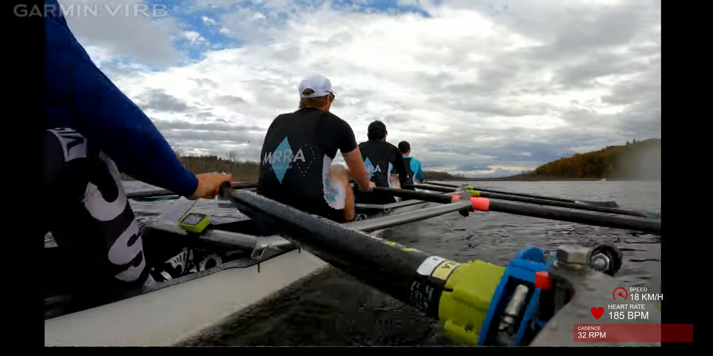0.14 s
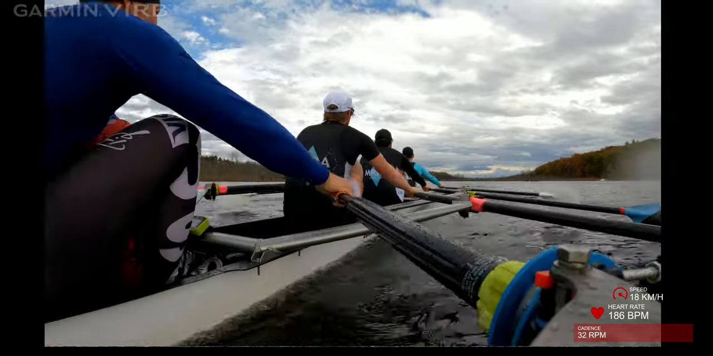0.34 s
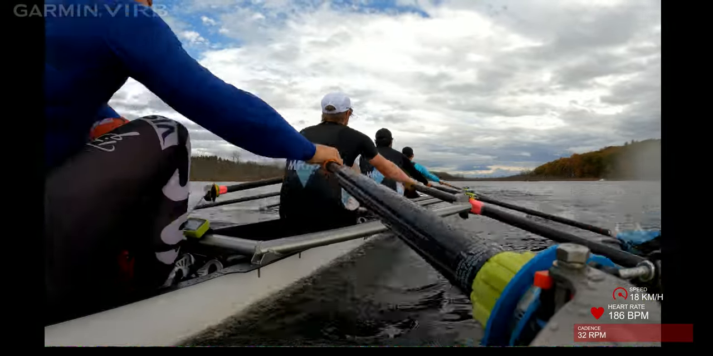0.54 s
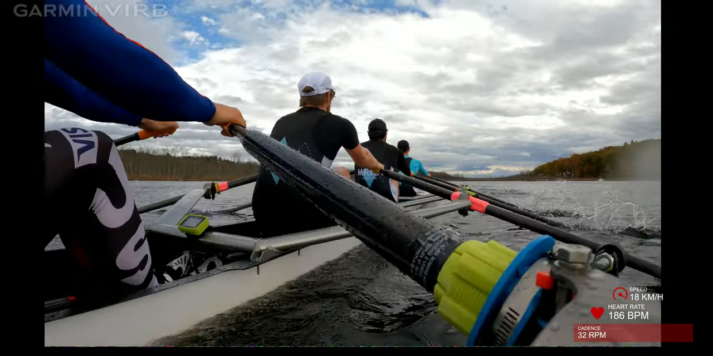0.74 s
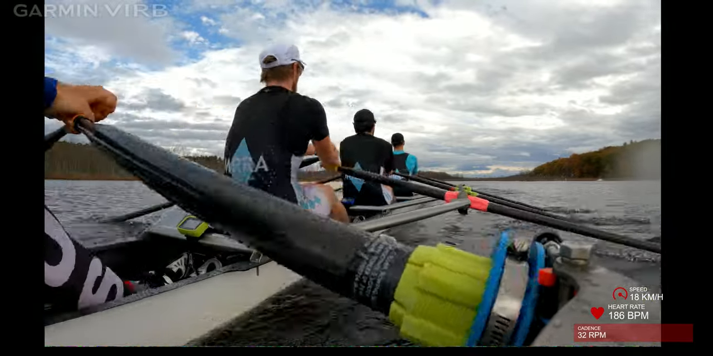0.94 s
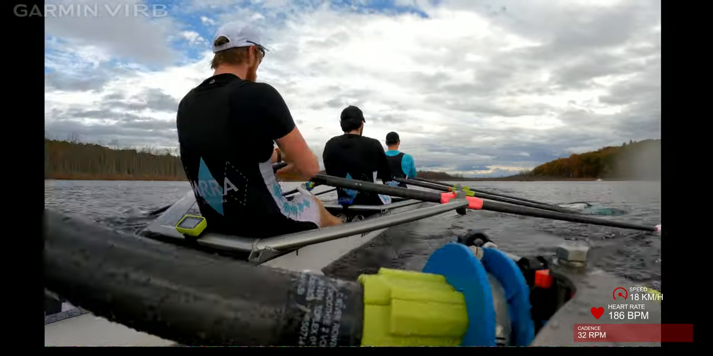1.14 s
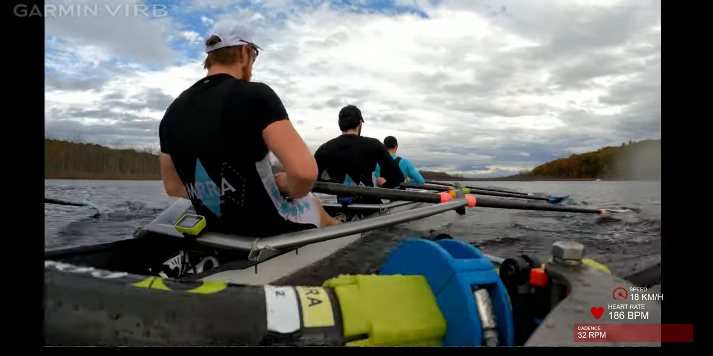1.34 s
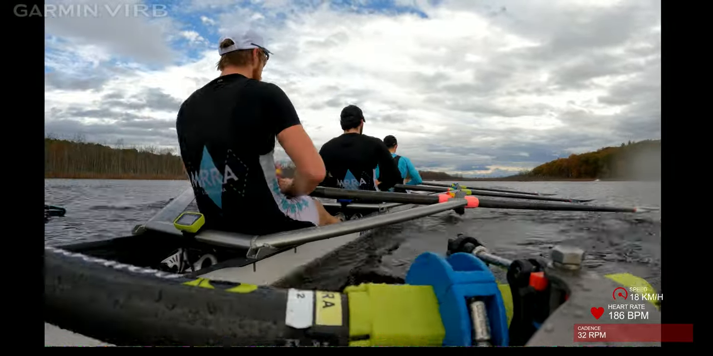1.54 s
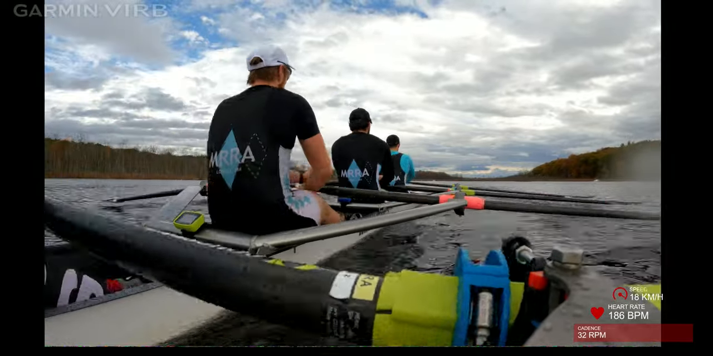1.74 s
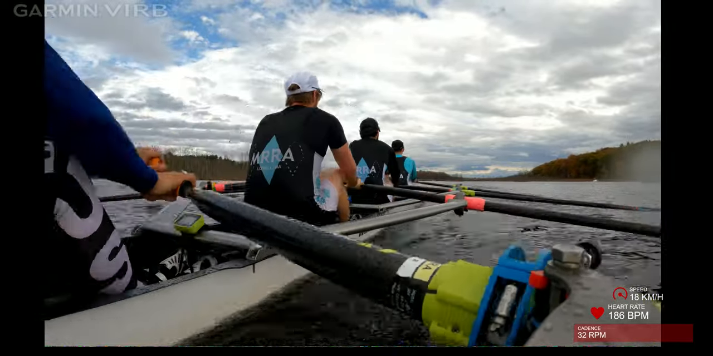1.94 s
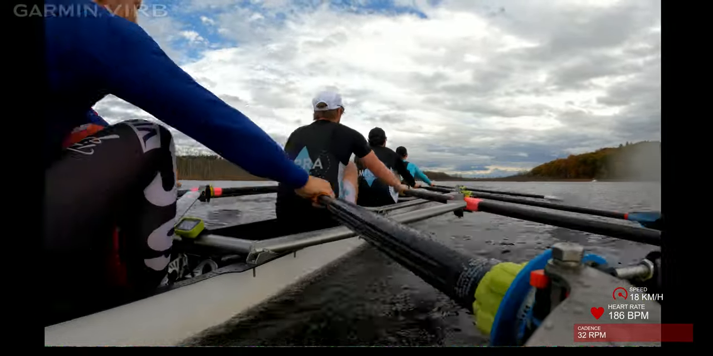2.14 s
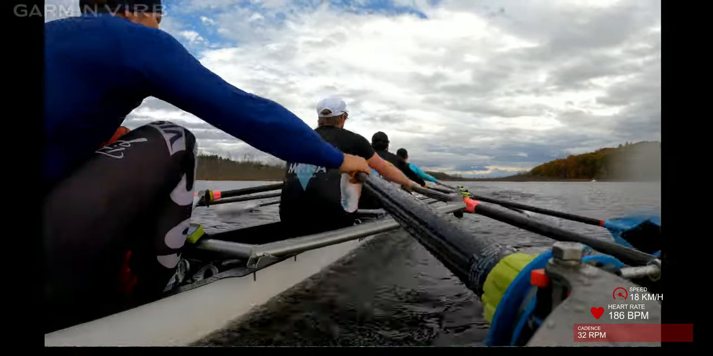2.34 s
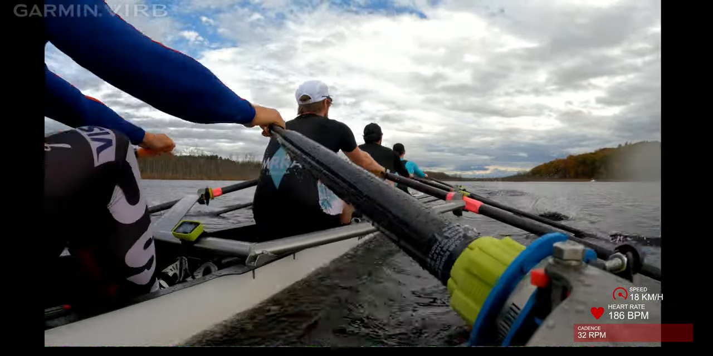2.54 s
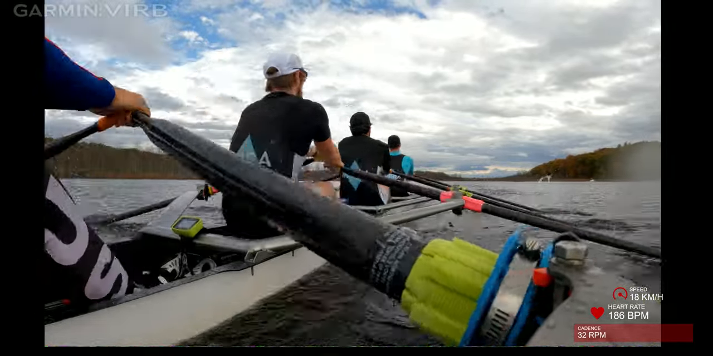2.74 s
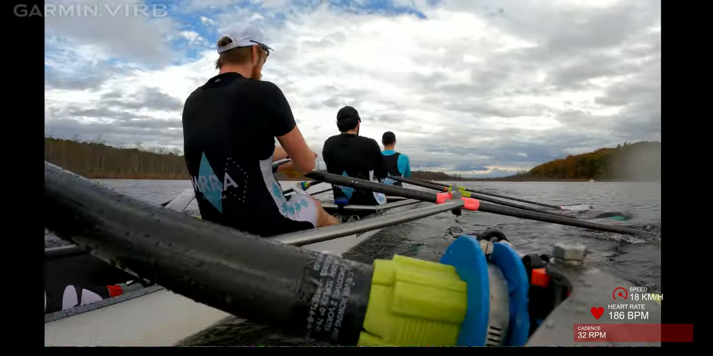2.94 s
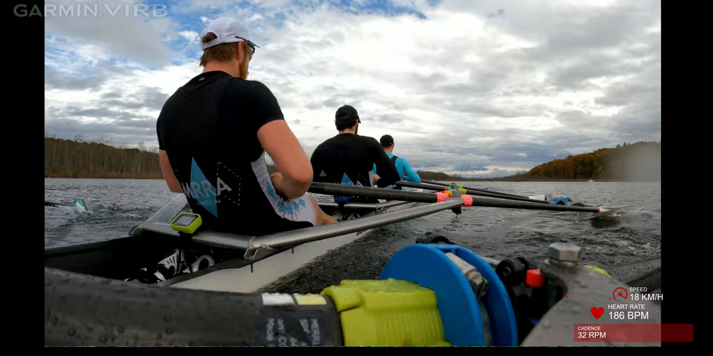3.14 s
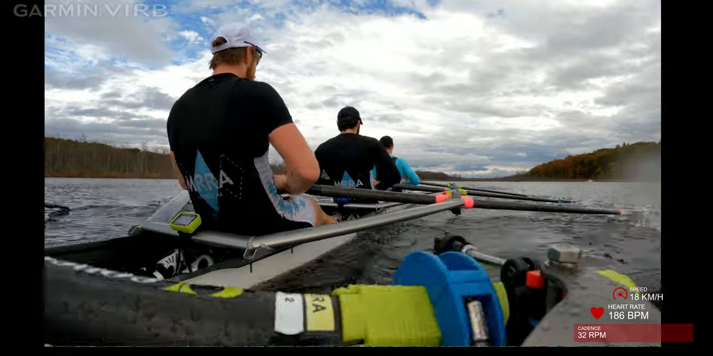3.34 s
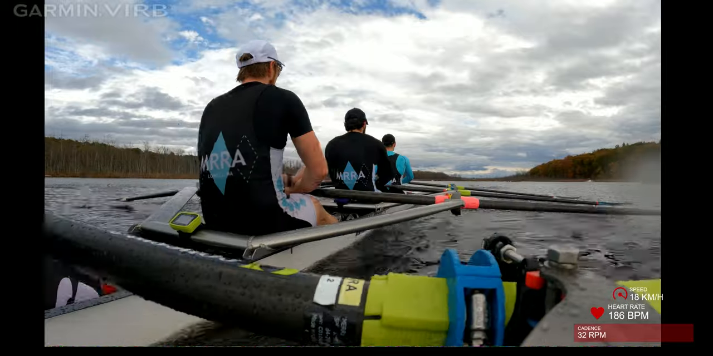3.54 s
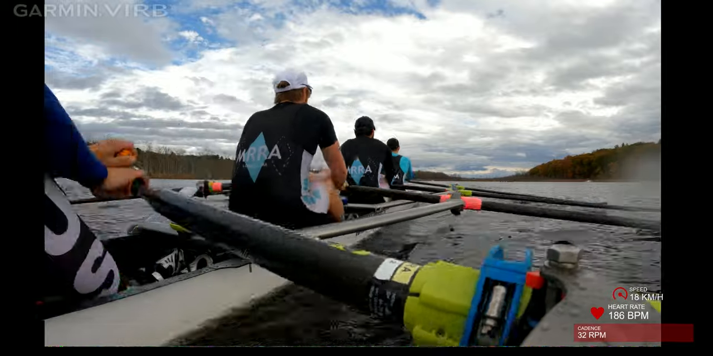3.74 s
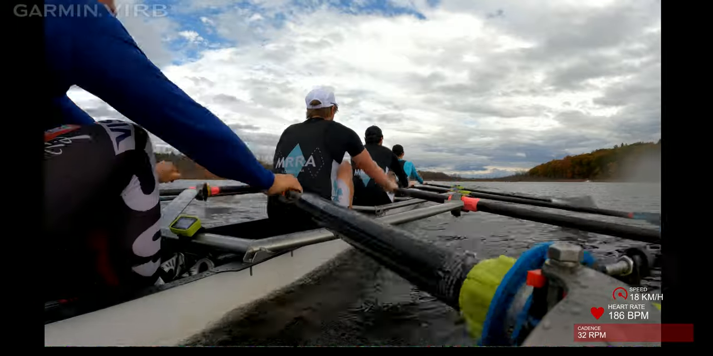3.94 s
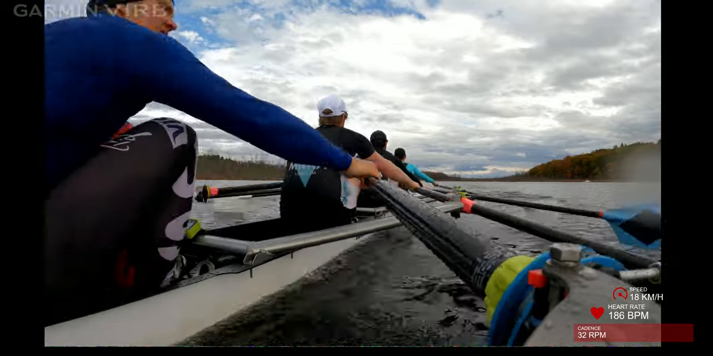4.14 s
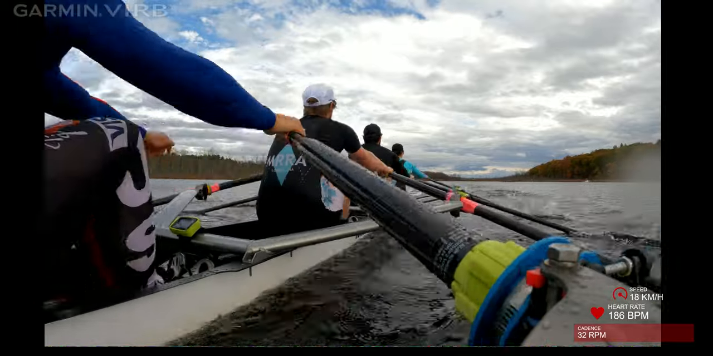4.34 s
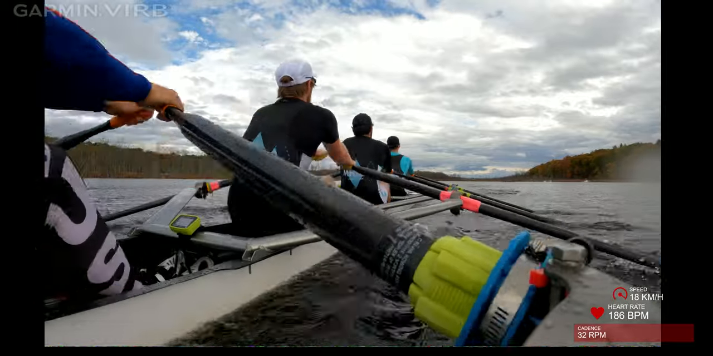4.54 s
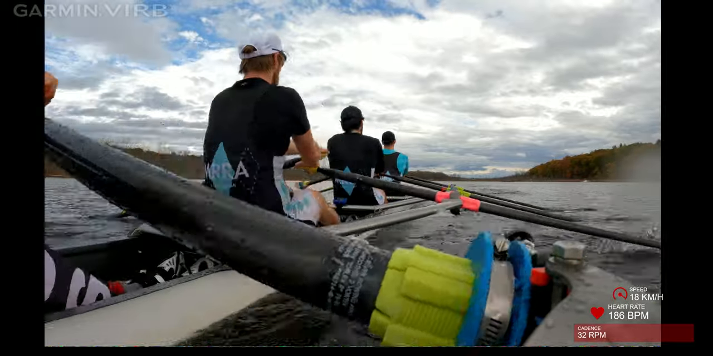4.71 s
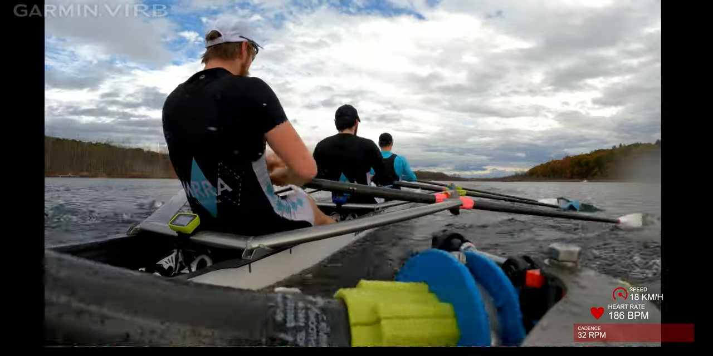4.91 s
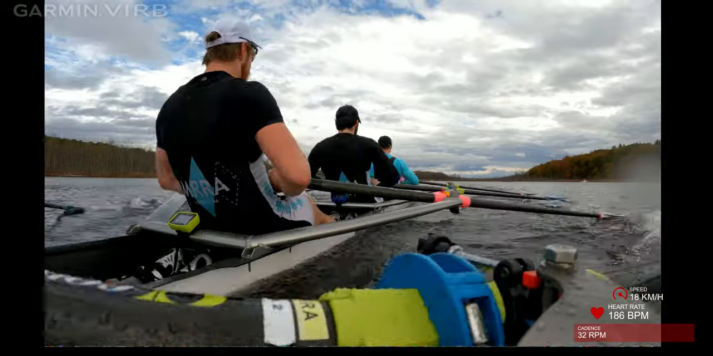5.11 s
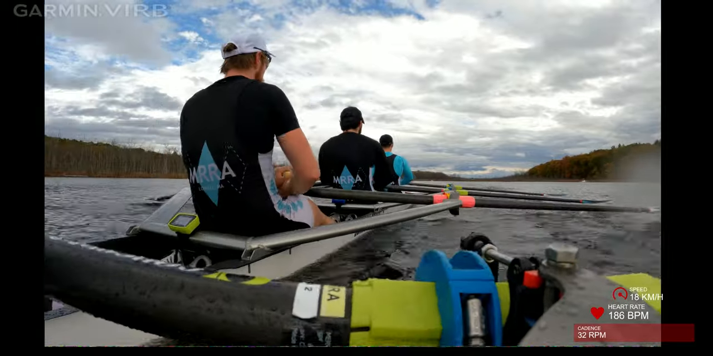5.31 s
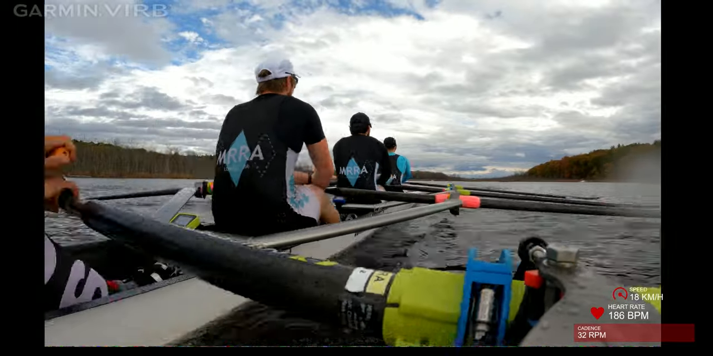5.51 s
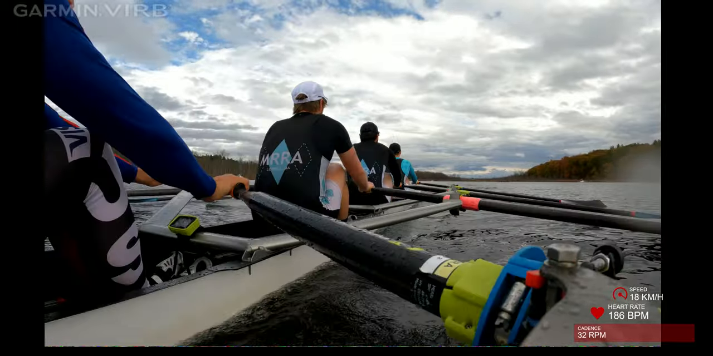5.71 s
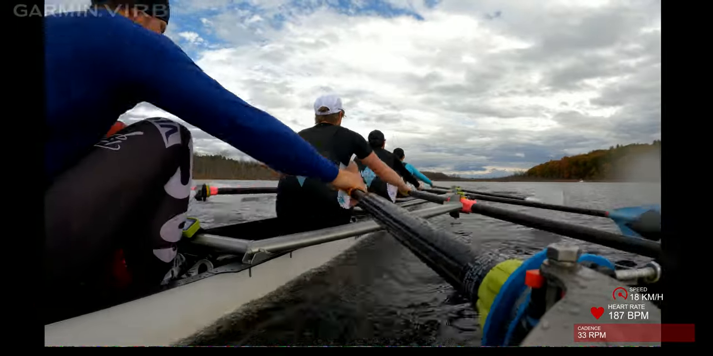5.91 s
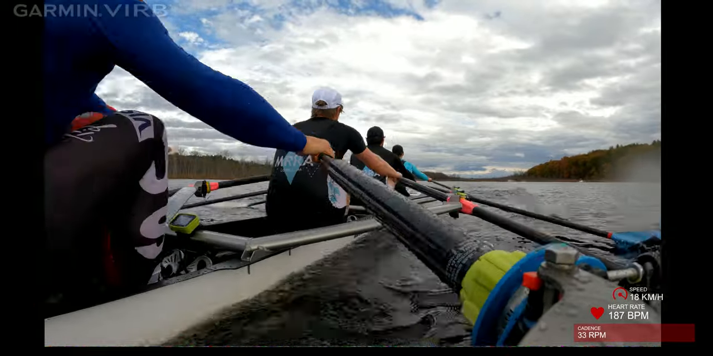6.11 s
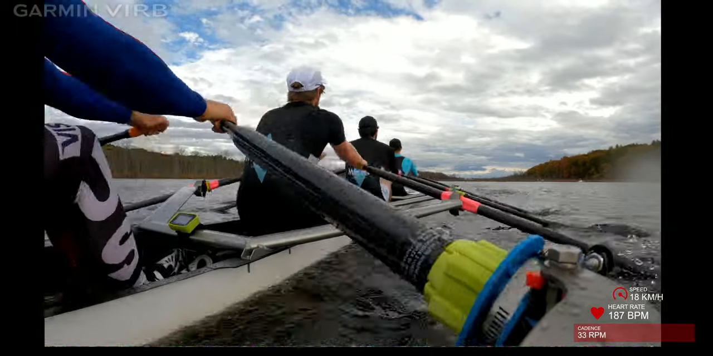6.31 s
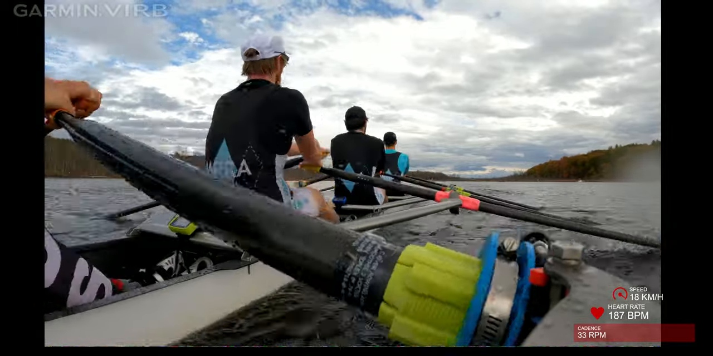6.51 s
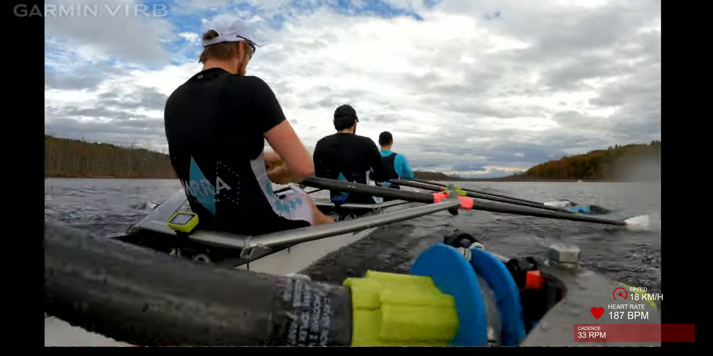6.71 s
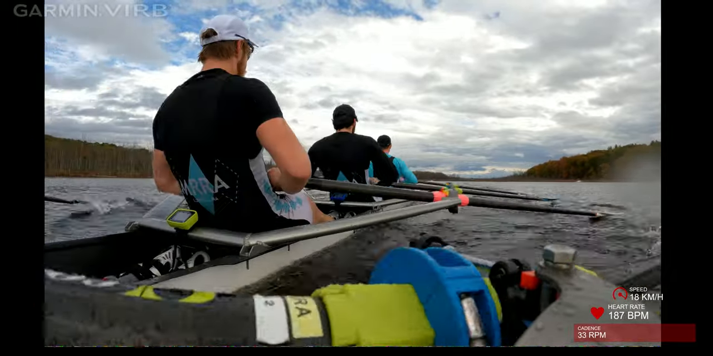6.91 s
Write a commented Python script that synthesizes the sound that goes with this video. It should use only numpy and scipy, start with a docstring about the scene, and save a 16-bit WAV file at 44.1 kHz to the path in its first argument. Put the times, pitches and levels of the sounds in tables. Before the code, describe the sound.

On open water, heard close from inside a sealed case on the rigger of a racing boat. Every stroke brings a rattling cluster of dull clunks as the oars drop in, a splash and drive, then another cluster as the blades come out and feather. Seats rumble up their tracks before each catch, water washes and gurgles along the hull, and low wind buffets. Small ticks ring the case.

```python
"""On open water, in a racing boat rowed at about 32 strokes a minute, heard inside a waterproof case on the rigger.
Filtered noise gives the wash of the lake, the wind on the case and the water that swells along the hull;
sine bubbles gurgle and plop. Trains of small impacts make the seats rumble and the sleeves rattle.
Struck bodies and damped modes give the clunks of the oars in their oarlocks, the ticks that ring the case
and the metal clinks, and the hardest feathers also send a dispersed zing along the shaft."""
import sys
import numpy as np
from scipy import signal
from scipy.fft import rfft, irfft
from scipy.io import wavfile
from scipy.ndimage import uniform_filter1d, minimum_filter1d

SR = 44100
rng = np.random.default_rng(int(sys.argv[2]) if len(sys.argv) > 2 else 0)


def unload_wav(signal):
    """Save mono or channel-first audio to the path in sys.argv[1] as 16-bit WAV at rate SR, clipped to [-1, 1]."""
    wavfile.write(
        sys.argv[1],
        SR,
        np.round(np.clip(np.atleast_2d(signal).T, -1, 1) * 32767).astype(np.int16),
    )


N = 306936
TIME = np.arange(N) / SR
SLOW_TIME = TIME[::64]  # coarse clock for the slow gains
CUTOFF_HZ = 15100

# All event levels are relative, ahead of the trim of their layer.
# Blades dropping in. Each row: start in seconds, rattle in dB, rattle length in s, splash in dB,
# splash length in s, water in the drive in dB, seats at full speed before the catch in s,
# seats speeding up in s per 20 dB, seats sliding up in dB, seats driving back in dB.
CATCHES = [(0.437, -34, 0.2, -15, 0.041, -24.5, .18, .17, -25, -26.5),
           (2.277, -31, 0.11, -19, 0.056, -21, 0.21, 0.24, -23.5, -27),
           (4.116, -36.5, 0.13, -17.5, 0.097, -21, .2, 0.17, -24.5, -27),
           (5.98, -31.5, 0.067, -16.5, 0.027, -20.5, 0.19, 0.19, -24, -26.5)]
# Blades coming out and feathering. Each row: start in seconds, rattle in dB, rattle length in s,
# rise of the wash in s per 20 dB, wash in dB, gust in dB.
FINISHES = [(-0.47, -30.5, 0.35, .04, -9, -29), (1.378, -32.5, 0.26, 0.22, -16, -21.5),
            (3.201, -30, 0.19, 0.048, -16.5, -26.5), (5.048, -32, 0.18, 0.03, -18, -25.5),
            (6.883, -38, .2, 0.11, -19.5, -25)]

# Slow gestures of each stroke. Each holds: delay in s, rise in s per 20 dB, hold in s, fall in s per 20 dB.
# A negative delay leads the stroke; a negative hold overlaps the rise and the fall.
GUST = (.01, .1, .15, .5)
HULL_RUN = (-0.19, 0.25, .15, 0.0067)
HULL_DRIVE = (0.33, 0.42, 0.17, 0.52)
RUSH_UP = (-.06, 0.42, -0.025, 0.26)
DRIVE_BACK = (0.26, 0.1, 0.37, 0.48)
ROCK_BACK = (.01, .08, .2, .3)

# Drops of the wind as the boat slows under the drive, and in some recoveries.
# Each row: start in seconds, depth in dB, length in s.
LULLS = [(0.765, -6, 0.38), (2.568, -12, 0.21), (3.718, -5, 0.08), (4.493, -16, 0.21), (5.653, -5.5, 0.015),
         (6.281, -13, 0.34)]
# Blades and wavelets plopping. Each row: start in seconds, level in dB, initial pitch in Hz, swell in s.
PLOPS = [(0.596, -25, 606, 0.0042), (1.103, -27, 750, 0.0018), (1.222, -27, 620, 0.0034),
         (1.305, -22, 740, 0.0064), (1.363, -14.5, 580, 0.0015), (1.461, -9, 562, 0.0017),
         (1.718, -21.5, 752, 0.0034), (1.836, -23, 600, 0.0028), (2.518, -31, 523, 0.0017),
         (2.78, -21, 534, 0.0022), (2.884, -17, 708, 0.0026), (3.0, -28.5, 683, .0015),
         (3.125, -33.5, 904, 0.0025), (3.653, -30, 1250, 0.0021), (4.388, -15, 560, 0.0039),
         (4.464, -22, 556, 0.0012), (4.626, -21, 548, 0.0022), (4.945, -23, 860, 0.0019),
         (4.963, -17.5, 813, 0.0033), (4.978, -23.5, 902, 0.0023), (5.013, -22, 580, 0.0042),
         (5.081, -18, 705, 0.0043), (5.602, -22.5, 850, 0.002), (6.231, -16.5, 597, 0.0031),
         (6.753, -15.5, 880, 0.0016), (6.799, -21, 688, 0.0061), (6.836, -24.5, 794, 0.0041)]
# Scuffs of a seat wheel on its track, on the way up the slide. Each row: start in seconds, level in dB.
SCUFFS = [(2.027, -24), (2.053, -26.5), (2.076, -29)]
# Light ticks on the rigger that ring the case. Each row: start in seconds, tick in dB, ring in dB.
TICKS = [(0.074, -49, -47), (0.284, -46, -34), (0.3238, -54, -49), (0.6680, -31, -27), (0.7841, -39, -29.5),
         (1.1438, -56.5, -31.5), (1.651, -33, -31), (1.663, -36, -30), (1.8812, -34.5, -32),
         (2.411, -56, -34.5), (2.438, -57, -35), (2.5437, -34, -26), (2.7497, -51, -46), (2.917, -56, -35),
         (3.0087, -45, -29.5), (3.0548, -63, -45), (3.266, -55, -31), (3.27, -56, -29), (3.306, -55, -29),
         (3.389, -50, -19), (3.5696, -50, -35.5), (4.2944, -26.5, -27.5), (4.4127, -62.5, -32),
         (4.7477, -50, -35.5), (4.776, -50, -45), (4.8215, -49, -43), (4.8482, -48.5, -35),
         (5.2772, -34, -31), (5.3466, -41, -47), (5.36, -48, -32), (5.3896, -40, -35), (5.4407, -31, -29.5),
         (5.602, -52, -47), (5.7873, -50, -41), (5.9315, -43, -39), (5.951, -47, -34.5),
         (6.071, -57.5, -30), (6.1338, -31, -26.5), (6.2026, -34.5, -30), (6.2415, -37, -30),
         (6.6858, -45, -29.5)]
# Clinks of the oarlock at the hardest feathers. Each row: start in seconds, clink in dB, snap in dB,
# zing in dB, pitch at which the zing splits in Hz.
CLINKS = [(1.5378, -32, -19, -46, 7700), (3.403, -33, -20.5, -43, 7540), (3.414, -38, -25, -38.5, 7230)]
# Hard knocks of oars in their oarlocks. Each row: start in seconds, clack in dB, thud in the hull in dB,
# sharp edge in dB.
KNOCKS = [(0.451, -18, -20, -34), (0.4606, -18, -17, -52), (0.4743, -25, -6, -53), (0.4845, -25, -7, -47),
          (0.509, -27, -12.5, -48), (0.5217, -22, -14, -26.5), (0.5451, -27, -11, -31),
          (0.562, -30, -15, -39), (0.582, -28, -19, -44), (0.5972, -23, -7, -55), (0.602, -24.5, -9, -48),
          (0.6164, -33, -11.5, -50), (1.332, -23, -5.5, -49), (1.4043, -26, -3.5, -53),
          (1.4154, -22, -4, -34), (1.4215, -27, -12, -52), (1.4437, -39, -15, -47), (1.4624, -22, -5, -46),
          (1.481, -26, -10, -50), (1.4993, -24, -22, -36), (1.524, -14.5, -19, -41),
          (1.5363, -21, -19, -31), (1.552, -25, -12, -50), (1.6015, -21.5, -26, -53),
          (1.605, -23.5, -17, -53), (2.2782, -19.5, -17, -44), (2.2899, -26, -1.5, -47),
          (2.3179, -36, -11, -47), (2.336, -36.5, -6, -42), (2.358, -17.5, -4, -28), (2.3827, -29, -5, -39),
          (2.3992, -34, -9, -47), (3.213, -16.5, -18, -36), (3.218, -20, -5, -35), (3.23, -33, -17.5, -50),
          (3.279, -22, -8, -28), (3.293, -34, -6, -51), (3.307, -28, -10, -57), (3.329, -23, -4, -48),
          (3.3528, -15, 0.5, -18.5), (3.374, -19, -17, -50), (3.389, -17, -15, -48),
          (3.392, -14, -2.5, -40), (3.453, -23.5, -29, -27), (3.494, -25, -29, -52),
          (4.124, -20.5, -7, -41), (4.133, -19, -27.5, -35), (4.186, -24, -14, -51),
          (4.1994, -15.5, -3.5, -31.5), (4.2229, -21, -0.5, -59.5), (4.2352, -29.5, -8.5, -52),
          (4.31, -26, -14.5, -49), (4.3289, -27.5, -9, -42), (4.344, -23, -28.5, -58),
          (5.055, -21, -2, -32), (5.0614, -28, -7, -31.5), (5.1082, -14.5, 2, -39), (5.119, -24, -9.5, -41),
          (5.1413, -25, -12, -37), (5.168, -18.5, -8, -34), (5.175, -25, 0, -38), (5.18, -27, -6, -36),
          (5.202, -17.5, -1, -44.5), (5.2089, -26, -22, -32.5), (5.222, -26, -9, -42),
          (5.236, -23, -13, -48), (5.2548, -22, -15, -55), (5.265, -21, -16, -55), (5.296, -23, -15, -54),
          (5.9839, -23, -19, -37), (5.991, -27, -20, -50), (6.0103, -21, -6, -43), (6.0246, -32, -13, -36),
          (6.037, -33, -7, -34), (6.9011, -21.5, -15, -41), (6.9076, -21, -5, -37), (6.927, -26, -12, -54)]

# Spectra of the media and bodies. Each row: frequency in Hz, relative density in dB per Hz.
LAKE = [(200, -2), (1000, -7.5), (1800, -13.5), (2700, -26.5), (3200, -30), (3600, -31.5), (3950, -52),
        (5200, -47), (7000, -66), (15000, -89)]
WIND = [(8, -9.5), (25, -0.5), (50, -6), (90, -8), (160, -16.5), (400, -51.5), (1500, -62.5), (4000, -110)]
WATER = [(40, -19), (90, -7), (140, 3.5), (220, -3), (320, -0.5), (420, -12), (800, -18), (1400, -21),
         (1800, -39), (2700, -37.5), (3200, -59.5), (4100, -66.5), (5200, -69.5), (7500, -85),
         (15000, -100)]
RUSH = [(300, -13), (700, 0.5), (1400, 4), (1750, -11), (2400, -7.5), (2800, -13), (3300, -24.5),
        (4000, -45.5), (8000, -70.5)]  # bow wave and wheels
SEATS = [(120, -22.5), (300, 1.5), (530, 3.5), (780, -0.5), (1000, -4), (1230, -5), (1500, -12),
         (1800, -27), (2200, -20), (2750, -34.5), (3200, -45), (4100, -69.5), (5200, -70), (7500, -87),
         (15000, -100)]
SCUFF = [(500, -31), (1200, 6), (1650, 1), (2100, -12.0), (3000, -28.5), (4200, -51), (9000, -90)]
GRIND = [(150, -19.5), (500, 4.5), (950, -0.5), (1250, 8.5), (1750, 0.5), (2300, -0.5), (2850, -3),
         (3300, -17.5), (4100, -37.5), (5100, -37.5), (6000, -43), (7500, -66), (14000, -72)]  # sleeve against oarlock
OARLOCK = [(150, -28), (500, 1.5), (950, 3), (1250, 9.5), (1750, 5), (2300, 11), (2800, -11.5), (3300, -13),
           (4150, -34), (5000, -32.5), (6000, -57.5), (7500, -42), (14000, -47.5)]
CASE = [(1200, -18.5), (1900, -10.5), (2250, -6.5), (2550, -2.5), (2850, -6), (3080, -25.5), (3800, -39),
        (7000, -62)]  # crowded modes of the case
EDGE = [(500, -9.5), (1600, 0), (2700, 3.5), (3300, 16), (4100, -6), (4550, 0), (5100, 2.5), (5800, -11),
        (6600, -20.5), (7800, -43.5), (10000, -53), (15000, -64)]  # sharp onset of a contact
SNAP = [(1000, -13), (3000, 2), (4200, 3.5), (5300, -8), (7300, -17), (8500, -30), (12000, -55)]  # metal on metal
SIZZLE = [(600, -14), (2200, -11), (3100, 3.5), (4000, -8), (5300, -17.5), (6300, -19), (7500, -35),
          (9200, -25.5), (11000, -41), (16000, -65)]
HULL = [(30, -18.5), (70, 1.5), (110, 8), (220, -4), (320, -3.5), (400, -2.5), (520, -7), (800, -9.5),
        (1400, -16.5), (3000, -55.5), (6000, -100)]
# Body of water closing over a bubble. Each row: frequency as a ratio to the bubble pitch, level in dB.
CAVITY = [(1 / 4, -30), (0.72, -8), (1, 0), (0.86, -5), (2, -32), (6, -85)]

# Resonances of the seat tracks. Each row: frequency in Hz, bandwidth in Hz, relative level in dB.
TRACK_MODES = [(323.2, 16, -7.5), (550, 110, -5.5), (1212, 98, -16)]
# Struck modes of the case, of the oarlock metal and of the oarlock gate.
# Each row: nominal frequency in Hz, relative level in dB, t60 in s.
CASE_MODES = [(2225, 0, 0.062), (2400, -6, 0.043), (2426, -3.5, 0.15), (2640, -5, 0.14), (2640, -6, 0.11)]
METAL_MODES = [(1900, 12, 0.099), (2160, 8, 0.084), (2160, 1, .14), (2640, -9, .17), (3150, -2, 0.23),
               (3130, -5, 0.21), (3760, -5, .15), (4070, -11, .17), (4100, -4, .16), (4950, -6, .09),
               (5400, -11, .1), (6450, -15.5, .08)]
GATE_MODES = [(318, -11, 0.012), (555, -1.5, 0.06), (756, 2.5, 0.097), (946, -2, 0.05), (1253, -3.5, 0.16),
              (1455, -5, 0.081), (2230, -17, 0.044), (2640, -11, 0.054)]

# Floors between the gestures (dB)
BREEZE_DB, RIPPLE_DB, SEAT_IDLE_DB = -22.5, -32.5, -39
# In the gesture settings below, rises and falls are in s per 20 dB.
LULL_RISE_S, LULL_FALL_S = 0.054, 0.31  # these scale with the depth of the lull: see wind()
SPLASH_AFTER_S, SPLASH_RISE_S, SPLASH_FALL_S = 0.016, 0.11, .22
WASH_AFTER_S, WASH_HOLD_S, WASH_FALL_S = 0.021, 0.18, 0.26
SLIDE_FALL_S = 0.13
RATTLE_RISE_S, RATTLE_FALL_S = 0.0091, 0.033
# Light rubbing before and after the sleeve turns; its level is relative to the rattle
RUB_DB, RUB_RISE_S, RUB_FALL_S = -4, 0.029, .6
# Falling branch of the zing: time to fall by a factor e, time of the peak, swell and fade, bandwidth
DIVE_S, DIVE_PEAK_S, DIVE_RISE_S, DIVE_FALL_S, DIVE_WIDTH_HZ = 0.06, 0.065, 0.064, 0.041, 1900
# Rising branch: extent and time constant of the climb, t60, bandwidth, level relative to the falling one
CLIMB_HZ, CLIMB_S, CLIMB_T60_S, CLIMB_WIDTH_HZ, CLIMB_DB = 3600, 0.038, 0.25, 2000, -21.5


def amp(db):
    """Converts decibels to an amplitude ratio."""
    return 10 ** (np.asarray(db) / 20)


def unit(x):
    """Normalises a signal to an rms of 1."""
    return x / np.sqrt(np.mean(x ** 2) + 1e-20)


def add(mix, s, sound):
    """Superposes a sound on the mix from time s."""
    part = mix[max(round(s * SR), 0):][:len(sound)]
    part += sound[:len(part)]


def noise():
    """White noise: equal power at all frequencies."""
    return rng.standard_normal(N)


def response(spectrum, size=4096):
    """Minimum-phase impulse response: a causal cepstrum fixes the phase; its energy is 1."""
    hz, db = np.transpose(spectrum)
    log_hz = np.log(np.fft.rfftfreq(size, 1 / SR) + 1)
    log_gain = np.log(amp(np.interp(log_hz, np.log(hz), db)))
    cepstrum = irfft(log_gain)
    cepstrum[1:size // 2] *= 2
    cepstrum[size // 2 + 1:] = 0
    taps = irfft(np.exp(rfft(cepstrum)))
    return taps / np.linalg.norm(taps)


def colour(x, spectrum):
    """Linear filtering: convolves a force with the response of a body."""
    return signal.oaconvolve(x, response(spectrum))[:len(x)]


def churn(x, depth_db, frame_count=12, bin_count=3):
    """Turbulent modulation: random patches in time and pitch swell and fade, as eddies and cavities do."""
    grid = signal.stft(x, nperseg=1024, noverlap=768)[2]
    patches = uniform_filter1d(rng.standard_normal(grid.shape), frame_count, axis=1)
    patches = uniform_filter1d(patches, bin_count, axis=0)
    return signal.istft(grid * amp(depth_db * unit(patches)), nperseg=1024, noverlap=768)[1][:N]


def surges(depth_db, length_s):
    """Slow random modulation: a gain that wanders between independent levels length_s apart."""
    steps = rng.standard_normal(1000)
    return amp(depth_db * np.interp(TIME / length_s, np.arange(len(steps)), steps))


def swell(s, after_s, rise_s, hold_s, fall_s):
    """Exponential envelope of one gesture: rises 20 dB in rise_s, holds at 1, falls 20 dB in fall_s."""
    t = SLOW_TIME - s - after_s
    return amp(-20 * (np.maximum(-t, 0) / rise_s + np.maximum(t - hold_s, 0) / fall_s))


def together(gains):
    """Incoherent addition: the powers of independent gestures sum; the result is a gain per sample."""
    return np.interp(TIME, SLOW_TIME, np.sqrt(sum(gain ** 2 for gain in gains)))


def impacts(per_s, spread_db):
    """Random point process: small blows of uneven size and either sign, at a mean rate per second."""
    size = amp(spread_db * np.minimum(rng.exponential(1, N), 4))
    return unit(size * rng.choice([-1, 1], N) * (rng.random(N) < per_s / SR))


def blow(spectrum, t60, chatter, size=8000):
    """Impulsive excitation: an impact and its dying contact noise drive a body; peak 1."""
    t = np.arange(size) / SR
    force = rng.standard_normal(size) * amp(-60 * t / t60) * (1 - np.exp(-t / 0.0007))
    force *= chatter / np.linalg.norm(force)
    force[0] += 1
    sound = colour(force, spectrum)
    return sound / abs(sound).max()


def ring(modes, detune, onset_s, size=12000):
    """Modal superposition: damped sines of random phase, slightly detuned at each contact; peak 1."""
    t = np.arange(size) / SR
    sound = np.zeros(size)
    for hz, db, t60 in modes:
        cycles = hz * rng.normal(1, detune) * t + rng.random()
        sound += amp(db - 60 * t / t60) * np.sin(2 * np.pi * cycles)
    sound *= np.tanh(t / onset_s) ** 2  # the body takes a moment to answer
    return sound / abs(sound).max()


def bubble(hz, swell_s, rise):
    """Volume oscillation of trapped air: it swells, rings while rising in pitch, and dies; envelope peak 1."""
    t = TIME[:SR // 9]
    envelope = (t / swell_s) ** 2 * np.exp(2 - 2 * t / swell_s)
    return envelope * np.sin(2 * np.pi * hz * t * (1 + rise * t))


def lake(level_db=-44, patchy_db=2, lap_db=2.5):
    """Distributed turbulence: the wash of open water is broadband noise that laps unevenly."""
    wash = colour(churn(noise(), patchy_db), LAKE)
    return amp(level_db) * unit(wash * surges(lap_db, length_s=0.11))


def wind(level_db=-0.6):
    """Pressure fluctuation on the case: low noise drops in the lulls and gusts as the boat surges at each finish."""
    lull_db = sum(db * swell(s, 0, LULL_RISE_S, length, LULL_FALL_S) for s, db, length in LULLS)
    gusts = [amp(gust_db) * swell(s, *GUST) for s, *_, gust_db in FINISHES]
    gain = together([amp(BREEZE_DB + lull_db)] + gusts)
    return amp(level_db) * gain * unit(colour(noise(), WIND))


def flow(run_db=-21):
    """Gain of flow along the hull: the run into the catch, the splash, the drive, the wash of the finish."""
    gains = [amp(RIPPLE_DB)]
    for s, _, _, splash_db, splash_s, drive_db, *_ in CATCHES:
        gains.append(amp(run_db) * swell(s, *HULL_RUN))
        gains.append(amp(drive_db) * swell(s, *HULL_DRIVE))
        splash = swell(s, SPLASH_AFTER_S, SPLASH_RISE_S, splash_s, SPLASH_FALL_S)
        gains.append(amp(splash_db) * splash)
    for s, _, _, rise_s, wash_db, _ in FINISHES:
        gains.append(amp(wash_db) * swell(s, WASH_AFTER_S, rise_s, WASH_HOLD_S, WASH_FALL_S))
    return together(gains)


def water(level_db=-3.0, patchy_db=2.5, surge_db=2.0):
    """Turbulent excitation of a shell: the hull drums with churning water that comes in surges."""
    churning = colour(churn(noise(), patchy_db, frame_count=18, bin_count=2), WATER)
    return amp(level_db) * flow() * unit(churning * surges(surge_db, length_s=.07))


def rush(level_db=-37, patchy_db=2.0):
    """Noise growing with speed: a smooth rush builds as the boat runs fastest, just before each catch."""
    gain = together([swell(s, *RUSH_UP) for s, *_ in CATCHES])
    return amp(level_db) * gain * unit(colour(churn(noise(), patchy_db), RUSH))


def gurgles(level_db=-8, cycles=2.29, rise=1.3, tilt=0.59, count=22):
    """A population of bubbles: many sizes ring along the hull, the large, low ones the loudest."""
    out = np.zeros(N)
    for hz in np.geomspace(170, 1100, count):
        sound = bubble(hz, cycles / hz, rise) / hz ** tilt
        for when, strength in rng.random(size=(52, 2)):
            add(out, when * N / SR, (2 * strength - 1) * sound)
    return amp(level_db) * flow() * unit(out)


def plops(level_db=1, rise=6, slosh=0.84):
    """Bubble resonance and cavity closure: a large bubble rings, and the water closes over it."""
    out = np.zeros(N)
    for s, db, hz, swell_s in PLOPS:
        add(out, s, amp(db + level_db) * bubble(hz, swell_s, rise))
        cavity = [(ratio * hz, cavity_db) for ratio, cavity_db in CAVITY]
        add(out, s, amp(db) * slosh * blow(cavity, t60=0.12, chatter=8.8))
    return out


def seats(level_db=0.0, patchy_db=1.3, finish_db=-26, drone_db=-7, jolt_db=1.0):
    """Rolling contact: wheels strike the grain of their tracks, which drone at their resonances."""
    gains = [amp(SEAT_IDLE_DB)]
    gains += [amp(finish_db) * swell(s, *ROCK_BACK) for s, *_ in FINISHES]
    for s, *_, lead_s, rise_s, up_db, back_db in CATCHES:
        gains.append(amp(up_db) * swell(s, -lead_s, rise_s, lead_s, SLIDE_FALL_S))
        gains.append(amp(back_db) * swell(s, *DRIVE_BACK))
    bumps = impacts(per_s=7000, spread_db=2.5)
    roll = unit(colour(churn(bumps, patchy_db), SEATS))
    for hz, width_hz, db in TRACK_MODES:
        drone = signal.lfilter(*signal.iirpeak(hz, hz / width_hz, SR), colour(bumps, SEATS))
        roll = roll + amp(drone_db + db) * unit(drone * surges(depth_db=1.0, length_s=0.15))
    return amp(level_db) * together(gains) * unit(roll * surges(jolt_db, length_s=0.036))


def scuffs(level_db=0, t60=0.19):
    """Sliding friction: a seat wheel scuffs the side of its track in a short burst of noise."""
    out = np.zeros(N)
    for s, db in SCUFFS:
        add(out, s, amp(db + level_db) * blow(SCUFF, t60, chatter=6))
    return out


def ticks(tick_db=0.0, clack_db=-1, ring_db=-5.0, shiver_db=-6, buzz_db=-10, body_db=-6, rebound_db=-7,
          rebound_s=0.012, vary=0.35):
    """Impact and rebound: a tick snaps the case, raps its mount, rebounds once and leaves both ringing."""
    out = np.zeros(N)
    for s, tick, level in TICKS:
        length, delay = np.exp(vary * rng.standard_normal(2))  # never quite alike
        add(out, s, amp(tick + tick_db) * blow(EDGE, t60=0.011, chatter=0.87))
        add(out, s, amp(level + clack_db) * blow(CASE, t60=0.018, chatter=0.78))
        add(out, s, amp(level + body_db) * blow(OARLOCK, t60=0.016, chatter=1.4))
        add(out, s + rebound_s * delay, amp(level + rebound_db) * blow(OARLOCK, t60=.03, chatter=2.5))
        add(out, s, amp(level + ring_db) * ring(CASE_MODES, detune=.018, onset_s=0.0036))
        add(out, s, amp(level + shiver_db) * blow(CASE, t60=0.19 * length, chatter=13))
        add(out, s, amp(level + buzz_db) * blow(GRIND, t60=0.14 * length, chatter=6.5))
    return out


def rattle(grind_db=-7.5, slip_db=-9.5, edge_db=-27, ring_db=-10):
    """Stick and slip: each sleeve grinds as it turns in its oarlock, and its small sharp jerks ring the case."""
    strokes = [row[:3] for row in CATCHES + FINISHES]
    turn = together([amp(db) * swell(s, 0, RATTLE_RISE_S, length, RATTLE_FALL_S)
                     for s, db, length in strokes])
    rub = together([amp(db + RUB_DB) * swell(s, 0, RUB_RISE_S, length, RUB_FALL_S)
                    for s, db, length in strokes])
    friction = np.hypot(turn, rub) * unit(churn(noise(), depth_db=2.0))
    grind = amp(grind_db) * colour(friction, GRIND)
    slips = turn * impacts(per_s=380, spread_db=7.0)
    jerks = amp(slip_db) * colour(slips, OARLOCK) + amp(edge_db) * colour(slips, EDGE)
    case = blow(CASE, t60=0.09, chatter=9.0)
    ringing = amp(ring_db) * signal.oaconvolve(slips, case / np.linalg.norm(case))[:N]
    return grind + jerks + ringing


def glide(hz, width_hz, ragged_db=3):
    """Frequency translation: complex low-pass noise is shifted along the pitch curve hz as a ragged band."""
    smooth = signal.butter(6, width_hz / 2, fs=SR, output="sos")
    in_phase, quadrature = signal.sosfilt(smooth, rng.standard_normal((2, len(hz))))
    carrier = np.exp(2j * np.pi * np.cumsum(hz) / SR)
    band = ((in_phase + 1j * quadrature) * carrier).real
    return unit(band * surges(ragged_db, length_s=0.0036)[:len(hz)])


def zing(split_hz):
    """Dispersion in the hollow shaft: pitches farther from the split arrive later, so one branch dives, one climbs."""
    t = TIME[:SR // 4]
    fade_db = -20 * np.maximum((DIVE_PEAK_S - t) / DIVE_RISE_S, (t - DIVE_PEAK_S) / DIVE_FALL_S)
    dive = amp(fade_db) * glide(split_hz * np.exp(-t / DIVE_S), DIVE_WIDTH_HZ)
    climb_hz = split_hz + CLIMB_HZ * (1 - np.exp(-t / CLIMB_S))
    climb = amp(CLIMB_DB - 60 * t / CLIMB_T60_S) * glide(climb_hz, CLIMB_WIDTH_HZ)
    return dive + climb


def clinks(snap_db=3, ring_db=3, sizzle_db=-6, scrape_s=0.11, sizzle_s=0.14):
    """Metallic contact: a scrape builds to a bright snap, then ringing modes, a sizzle and the zing of the shaft."""
    out = np.zeros(N)
    for s, db, snap, zing_db, split_hz in CLINKS:
        add(out, s, amp(snap + snap_db) * blow(SNAP, t60=.004, chatter=0.314))
        add(out, s, amp(db + ring_db) * ring(METAL_MODES, detune=0.017, onset_s=.003))
        # 60 dB up over the scrape, 60 dB down over the sizzle
        fade = amp(-60 * np.maximum((s - TIME) / scrape_s, (TIME - s) / sizzle_s))
        out += amp(db + sizzle_db) * colour(fade * impacts(per_s=4400, spread_db=2.0), SIZZLE)
        add(out, s, amp(zing_db) * zing(split_hz))
    return out


def knocks(clack_db=1.0, thud_db=-1, edge_db=0, ring_db=-3):
    """Collision of oar and oarlock: a hard edge, a plastic clack that rings the gate, a thud into the hull."""
    out = np.zeros(N)
    for s, clack, thud, edge in KNOCKS:
        add(out, s, amp(clack + clack_db) * blow(GRIND, t60=0.063, chatter=2.6))
        add(out, s, amp(clack + ring_db) * ring(GATE_MODES, detune=0.045, onset_s=0.00076))
        add(out, s, amp(thud + thud_db) * rng.choice([-1, 1]) * blow(HULL, t60=0.15, chatter=0.73))
        add(out, s, amp(edge + edge_db) * blow(EDGE, t60=0.01, chatter=0.89))
    return out


def scene():
    """Linear superposition: all sources add at the one microphone in the case."""
    surroundings = lake() + wind() + water() + rush() + gurgles() + plops()
    crew = seats() + scuffs() + ticks() + rattle() + clinks() + knocks()
    return (surroundings + crew)[None]


def record(dry):
    """Gain reduction and band limiting: a quick, soft limiter rounds the loudest clunks, then a low-pass acts."""
    ceiling = .58
    gain = (1 + (dry / ceiling) ** 6) ** (-1 / 6)
    gain = minimum_filter1d(gain, size=200)
    gain = uniform_filter1d(uniform_filter1d(gain, size=100), size=100)
    low_pass = signal.firwin(511, CUTOFF_HZ, window=("kaiser", 9), fs=SR)
    return signal.oaconvolve(dry * gain, low_pass[None], "same")


dry = scene()
out = record(dry)
unload_wav(out)
```